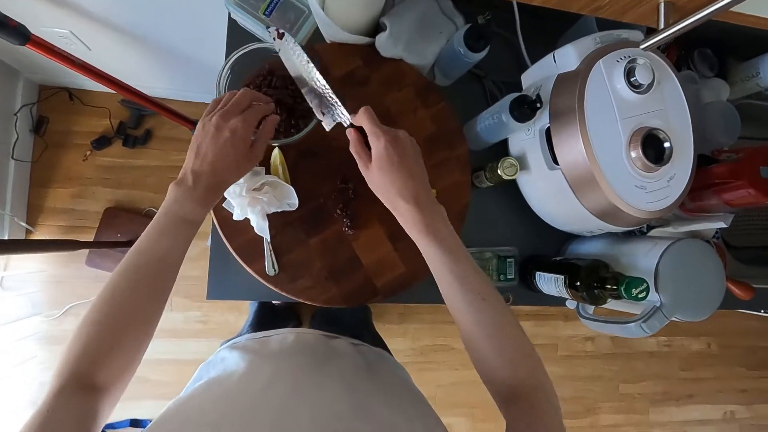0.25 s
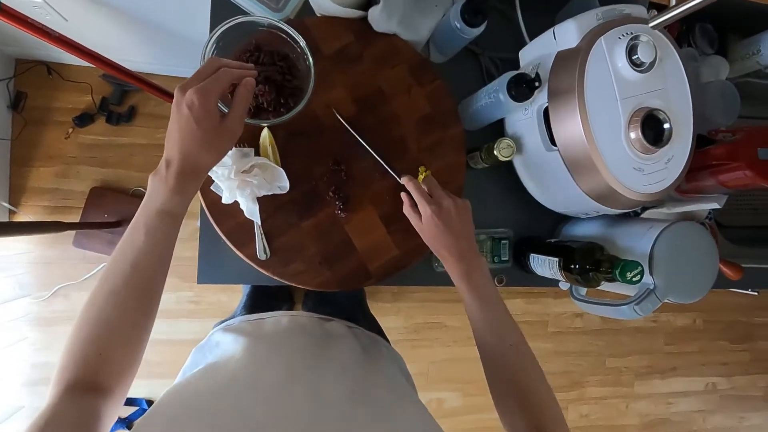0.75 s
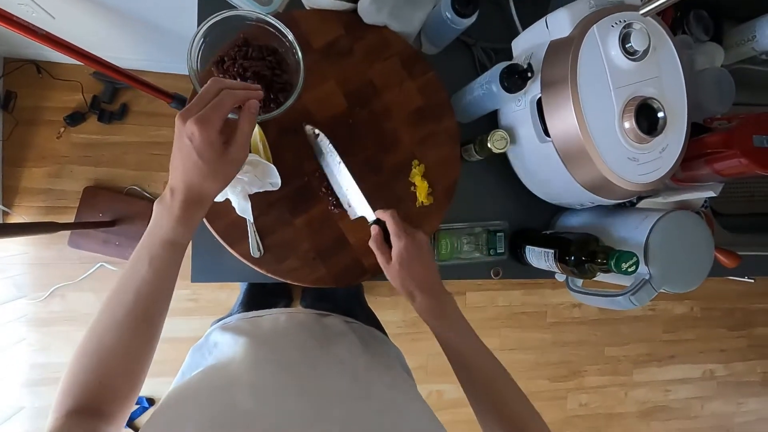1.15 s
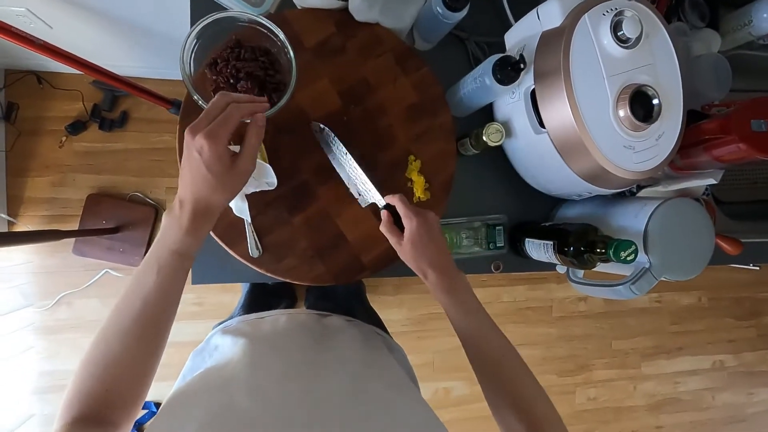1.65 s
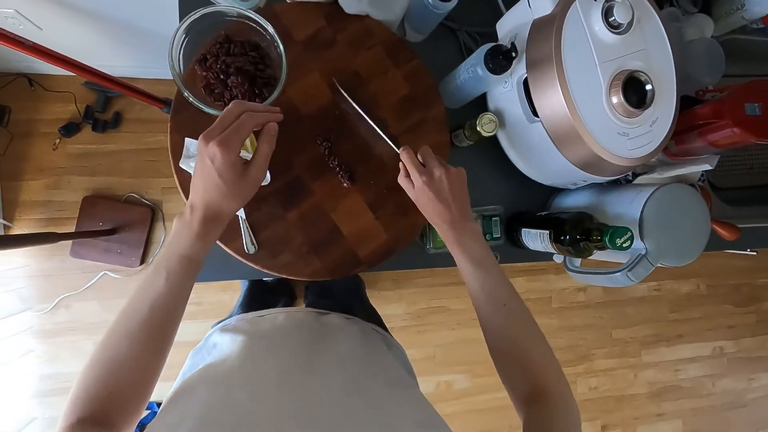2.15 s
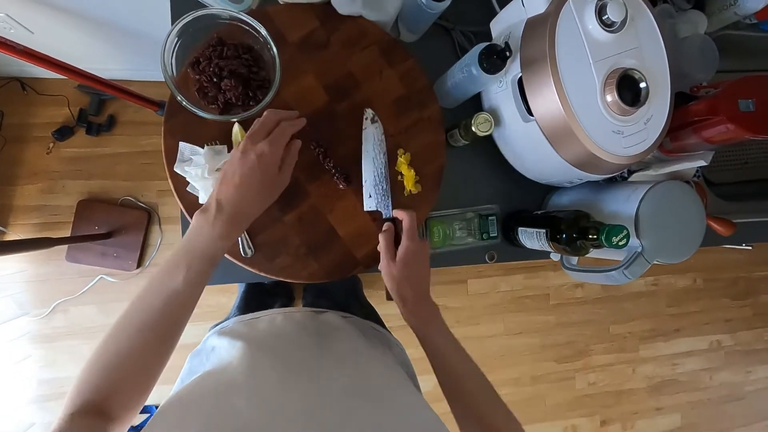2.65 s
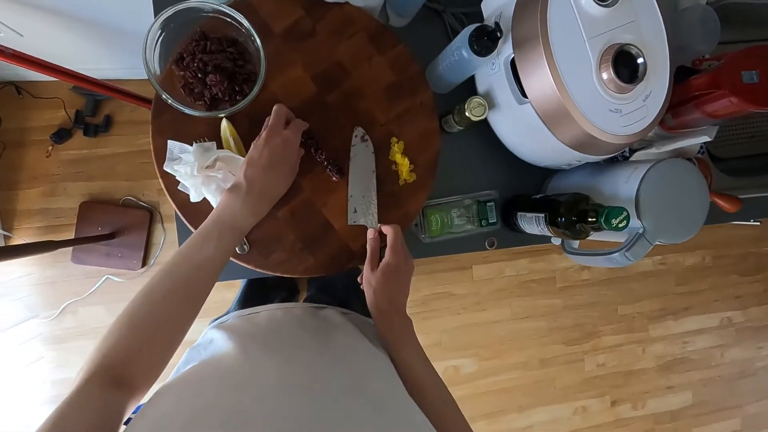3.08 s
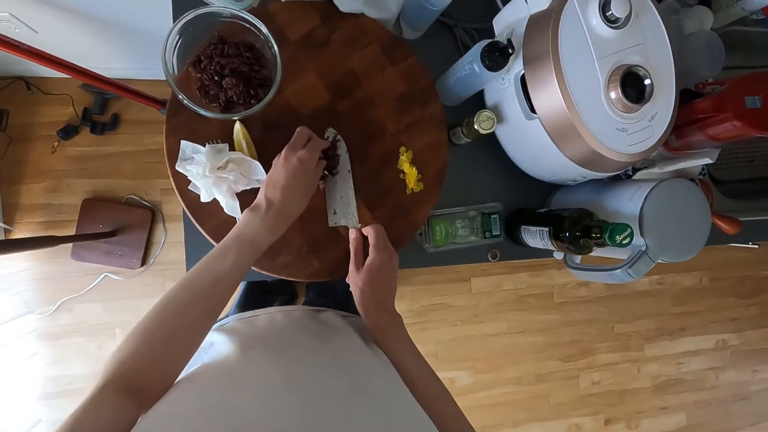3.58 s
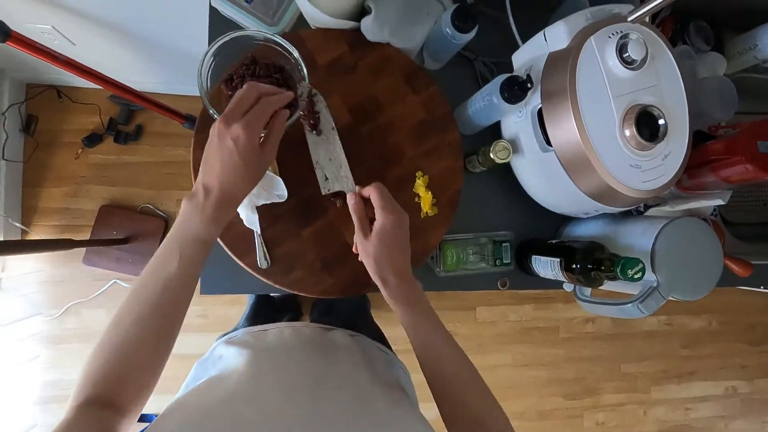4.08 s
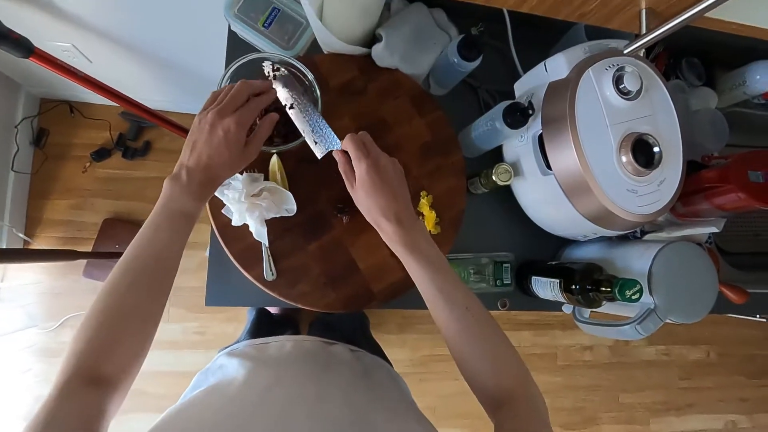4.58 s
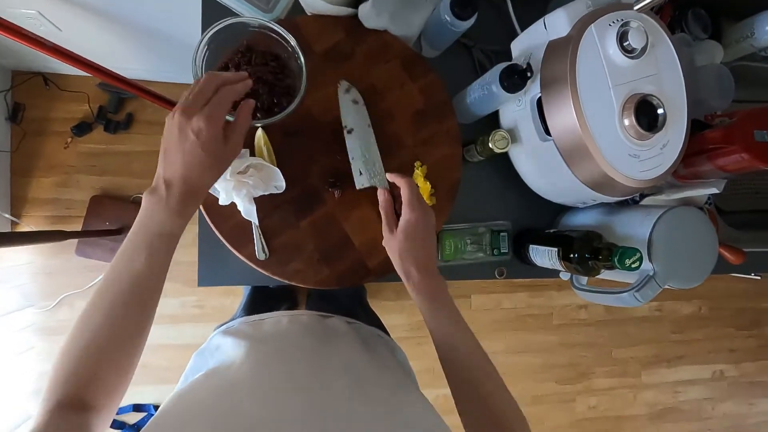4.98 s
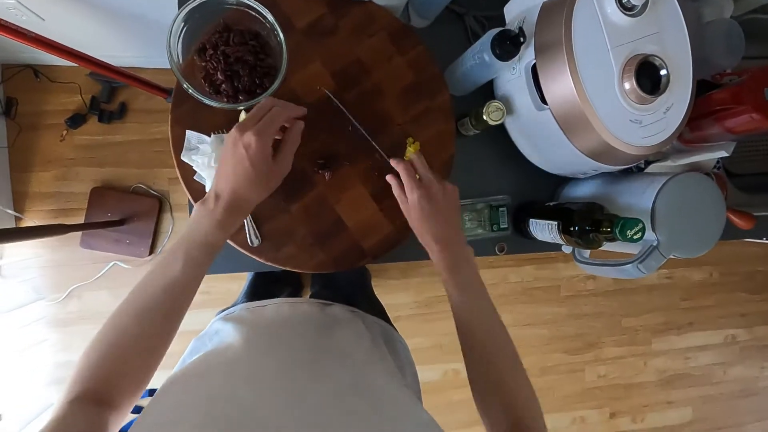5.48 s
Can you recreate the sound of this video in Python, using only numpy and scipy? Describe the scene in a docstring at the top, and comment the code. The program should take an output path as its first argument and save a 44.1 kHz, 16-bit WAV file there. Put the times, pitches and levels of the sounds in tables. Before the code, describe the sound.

In a small home kitchen, a chef's knife knocks on a heavy wooden board, then sweeps across it with bright, ringing steel scrapes. It is laid flat with a clink and slides softly under chopped food, then barely ticks a glass bowl before touching the board again. A low appliance hum wavers underneath, with a very faint bird outside. Close stereo microphones, short room echo.

```python
"""Knife on a chopping board

A chef's knife knocks on an end-grain board (decaying modes and noise bursts) and sweeps chopped food together,
its blade ringing as friction feeds it. It is laid flat to scoop, and ticks over a glass bowl.
An appliance hums (wavering sines) in the small room over filtered noise; a bird chirps very faintly outside
(arched tones). Two close microphones hear it all."""
import sys
import numpy as np
from scipy import signal
from scipy.fft import rfft, irfft, next_fast_len
from scipy.io import wavfile
from scipy.ndimage import uniform_filter1d, map_coordinates

SR = 44100
rng = np.random.default_rng(int(sys.argv[2]) if len(sys.argv) > 2 else 0)


def put_to_file(sound):
    """Save the sound as 16-bit audio at rate SR, in the file named by the first command-line argument."""
    columns = np.atleast_2d(sound).T  # one column per channel
    safe = np.clip(columns, -1, 1)
    whole_steps = np.round(safe * 32767)
    wavfile.write(sys.argv[1], SR, whole_steps.astype(np.int16))


N = 252781
T = np.arange(N) / SR
HIT_T = T[:SR // 2]  # time within one short sound, s

# Blade modes; where the blade touches decides which speak. Each row: frequency in Hz, width in Hz,
# gain in dB as the contact travels outward, then levels in dB sweeping out, sweeping back, sliding flat, tapped.
BLADE_MODES = [(950, 36, -5.5, -10.5, -13, -11, 1), (1239, 19.6, -1, -23, -23, -14, 3),
               (1515, 28, 1, -24, -5.5, -9, 8.5), (1667, 55, -6.5, 0, -8.5, -4, -16),
               (2020, 55, 0, -10, -9.5, -14, -24), (2313, 67, -0.5, -13, -6, 1.5, 8.5),
               (3315, 26, -10.5, -15, -9, -16, -4.5), (3570, 90, 1, -26, -28, -1, 0),
               (4000, 65, -7, -9, -13, -14, -5.5), (4200, 130, -3, -25, -12.5, -21, -16),
               (4400, 130, -3, -26, -12, -19, -18), (4590, 17, 0, -14, -20.5, -5, -9),
               (4825, 45, -7.5, 3.5, -18.5, -1, -7), (5080, 130, -3, -15, -14, -15, -17),
               (5280, 56, 4.5, -18.5, -3.5, -19, -10), (5650, 80, -1, -6, -8, -15, -15),
               (5820, 55, 0, 3, -12, -14, -5), (6190, 65, -0.5, -15, -18, 0.5, -7.5),
               (6750, 50, -4, 0.5, -11.5, -2, -4), (7095, 28, -1.5, 6, 4, -7, -9),
               (7650, 48, -2, 4.5, 4, -3, -13.5), (8160, 70, 3, -2, -2, -16, -15),
               (8790, 130, 0.5, -1, -5.5, -24, -27), (9500, 240, 0.5, -7.5, -11.5, -29, -19),
               (10270, 76, -2.5, -9, -13, -17, -30), (11800, 200, -1, -12, -16, -15, -18)]
# Dense upper modes of the steel. Each row: frequency in Hz, relative level in dB per Hz.
STEEL_SPECTRUM = [(1500, -18), (3000, -5.5), (5000, -12.5), (7000, 0), (8900, -6), (10800, -13),
                  (12300, -13.5), (15500, -28)]
# Rasp of the wood fibres. Each row: frequency in Hz, relative level in dB per Hz.
WOOD_SPECTRUM = [(200, -8.5), (480, -0.5), (640, -5), (900, 6.5), (1400, 1), (2300, -5), (2900, -12.5),
                 (5000, -47)]
# Modes of the board. Each row: frequency in Hz, relative level in dB, 60 dB decay time in seconds.
BOARD_MODES = [(165, -12, .11), (330, -13, .06), (500, -4, .05), (720, -3.5, .035), (830, -6, .03),
               (960, -3, .035), (1130, -14, .03), (1280, -3.5, .03), (1440, -2, .035), (1640, -1, .035),
               (1860, 0, .028), (2050, -4, .022), (2450, -11, .02)]
# Click of the steel contact. Each row: frequency in Hz, relative level in dB per Hz.
CLICK_SPECTRUM = [(800, 13.5), (2400, -7), (3200, 3), (4000, -2.5), (5400, 2.5), (7200, -16), (8500, -12),
                  (9600, -21.5), (12000, -21.5), (15500, -59.5)]
# Thud of the counter under the board. Each row: frequency in Hz, relative level in dB per Hz.
THUD_SPECTRUM = [(40, -9.5), (90, 1.5), (165, 10.5), (260, -8), (420, -7.5), (700, -12.5), (1500, -60)]


def amp(db):
    """Level: decibels become an amplitude factor."""
    return 10 ** (np.asarray(db) / 20)


def unit(x):
    """Normalisation: scale to rms 1."""
    return x / np.sqrt(np.mean(x ** 2) + 1e-20)


def along(points, hz):
    """Logarithmic pitch: interpolate (Hz, value) points on a log frequency axis."""
    f, v = np.transpose(points)
    return np.interp(np.log(hz + 1), np.log(f + 1), v)


def wobble(rate):
    """Slow modulation: a smooth random curve with rate knots a second."""
    knots = rng.standard_normal(int(N * rate / SR) + 4)
    return map_coordinates(knots, [T * rate])


def filtered(x, response):
    """Linear filtering: multiply the spectrum by a response of frequency."""
    n = x.shape[-1]
    m = next_fast_len(n + SR // 4)
    hz = np.fft.rfftfreq(m, 1 / SR)
    return irfft(rfft(x, m) * response(hz), m)[..., :n]


def coloured(x, spectrum):
    """Coloured noise: x shaped by a (Hz, dB) spectrum, at rms 1."""
    return unit(filtered(x, lambda hz: amp(along(spectrum, hz))))


def decay_time(width_hz):
    """Damping: a resonance of this width dies by 60 dB in this many seconds."""
    return np.log(1000) / (np.pi * width_hz)


def burst(x, rise_s=0.00013):
    """Impact: a blow has a finite contact time; its energy is set to that of 10 ms at rms 1."""
    x = x * (1 - np.exp(-(HIT_T / rise_s) ** 2))
    return x / np.sqrt(np.sum(x ** 2) / (SR / 100) + 1e-20)


def ring(modes):
    """Modal decay: one blow on (Hz, dB, t60) modes, each at a slightly random strength and a random phase."""
    total = np.zeros(len(HIT_T))
    for hz, db, t60 in modes:
        decay = amp(db + rng.normal() - 60 * HIT_T / t60)
        total += decay * np.sin(2 * np.pi * (hz * HIT_T + rng.random()))
    return burst(total)


def puff(spectrum, t60):
    """Dense modes: too many to resolve, they sound as a short dying noise."""
    noise = coloured(rng.standard_normal(len(HIT_T)), spectrum)
    return burst(noise * amp(-60 * HIT_T / t60))


def add(track, s, sound):
    """Superposition: mix a sound into the track at s seconds."""
    part = track[round(s * SR):][:len(sound)]
    part += sound[:len(part)]


def chops(settle_s=0.001213, first_touch=0.6, focus_db=22):
    """Impact excitation: the push builds as the edge settles; blade modes that suit the spot ring briefly."""
    # Edge landings. Each row: start in seconds, levels in dB of knock, edge click, low thud and blade ring,
    # pitch in Hz where the ring peaks, tilt of the board modes in dB per octave.
    landings = [(0.7643, -33.5, -45, -40, -54, 5000, -.3), (1.4269, -32, -45.5, -38.5, -54, 6600, 0),
                (2.2144, -34, -50, -43, -56, 6700, .3), (2.7639, -52, -63, -66, -72, 5400, 1)]
    grip_hz = 35  # extra width of the blade's modes while its edge sits in the wood
    out = np.zeros(N)
    push = np.clip(first_touch + HIT_T / (2 * settle_s), 0, 1)
    for s, knock_db, click_db, thud_db, blade_db, peak_hz, tilt_db in landings:
        # blade modes weaken by focus_db per octave away from the peak
        upper = [(hz, -focus_db * abs(np.log2(hz / peak_hz)), decay_time(w + grip_hz))
                 for hz, w, *_ in BLADE_MODES if hz > 3000]
        board = [(hz, db + tilt_db * np.log2(hz / 1000), t60) for hz, db, t60 in BOARD_MODES]
        wood = burst(push * (ring(board) + amp(-1.5) * puff(WOOD_SPECTRUM, t60=0.047)))
        click = amp(click_db) * push * puff(CLICK_SPECTRUM, t60=0.032)
        steel = click + amp(blade_db) * ring(upper)
        thud = amp(thud_db) * puff(THUD_SPECTRUM, t60=0.14)
        add(out, s, amp(knock_db) * wood + steel + thud)
    return out


def sing(hz, width_hz, turns=0):
    """Resonance under friction: noise feeds a mode, its swing steadied; extra turns bend its pitch; rms 1."""
    steadiness, skirt = .42, 7  # exponent of levelling; width of the second resonator over the first
    swing = rng.standard_normal(len(HIT_T))
    for width in (width_hz, skirt * width_hz):
        pole = np.exp((2j * hz - width) * np.pi / SR)
        swing = signal.lfilter([1], [1, -pole], swing)
    size = np.sqrt(abs(uniform_filter1d(abs(swing) ** 2, SR // 200)))
    bent = (swing * np.exp(2j * np.pi * turns)).real
    return unit(bent / (size + 1e-9) ** steadiness)


def friction(rough_db, grain):
    """Stick-slip noise: countless tiny slips of steel over the wood's fibres."""
    n = len(HIT_T)
    slips = rng.standard_normal(n) * np.exp(grain * rng.standard_normal(n))
    return unit(slips * amp(rough_db * wobble(900)[:n]))


def scrapes(pressure_db=.5):
    """Sliding friction: rasp and low modes last as long as the hand presses; the treble swells with speed."""
    # Strokes of the blade over the board, the last a faint scrape on the bowl. Each row: touch in seconds,
    # lift in seconds, fastest moment in seconds, half length of the swing in seconds,
    # travel of the contact (1 outward, -1 inward), ring in dB, hiss in dB, hiss tilt in dB per octave,
    # wood in dB, how the blade is held.
    sweeps = [(0.847, 0.962, 0.922, 0.033, -.3, -66.5, -64, 5, -61.5, "back"),
              (1.476, 1.711, 1.583, 0.042, 1, -39, -45, 4.5, -63, "out"),
              (2.206, 2.499, 2.365, 0.065, -1, -45, -49, 2.5, -58, "back"),
              (3.189, 3.363, 3.256, 0.035, 0, -60, -66.5, -4, -80, "flat"),
              (3.293, 3.624, 3.325, 0.14, 0, -82, -76, -3, -70, "flat"),
              (3.7, 3.9, 3.81, 0.044, 0, -91, -90, 6, -80, "flat"),
              (4.46, 4.6, 4.54, 0.026, 0, -82, -80, 1, -78, "flat")]
    press_s, lift_s = 0.051, 0.017  # the hand leans on the blade and lets go
    # at speed_hz loudness is proportional to speed; higher sounds depend on it more steeply
    speed_hz, speed_law = 6960, 0.89
    steepest_hz = 8500  # above this pitch all of the treble follows the speed alike
    rub_hz = 12  # extra width of the blade's modes while it rubs
    grit_db, grit_per_s = 1.5, 520  # the whole blade sticks and slips
    out = np.zeros(N)
    for touch, lift, fastest, length, travel, ring_db, hiss_db, tilt_db, wood_db, pose in sweeps:
        column = ("out", "back", "flat").index(pose)
        # as the contact travels along the blade, some modes gain and others fade
        place = travel * np.clip((touch + HIT_T - fastest) / (2 * length), -1, 1)
        blade, sizes = np.zeros(len(HIT_T)), []
        for hz, w, lean_db, *levels in BLADE_MODES:
            size = amp(levels[column]) * np.sqrt(w)  # a wider mode takes up more of the noise
            blade += size * amp(lean_db * place) * sing(hz, w + rub_hz)
            sizes.append(size)
        blade /= np.linalg.norm(sizes)
        tilted = [(hz, db + tilt_db * np.log2(hz)) for hz, db in STEEL_SPECTRUM]
        hiss = coloured(friction(rough_db=1, grain=0.45), tilted)
        wood = coloured(friction(rough_db=1.5, grain=0.35), WOOD_SPECTRUM)
        rubbing = amp(ring_db) * blade + amp(hiss_db) * hiss + amp(wood_db) * wood
        hz, t, z = signal.stft(rubbing, SR, nperseg=256)
        height = np.clip(hz, hz[2], steepest_hz)[:, None] / speed_hz
        speed = np.exp(-.5 * ((touch + t - fastest) / length) ** 2)
        pressure = np.clip(np.minimum(t / press_s, (lift - touch - t) / lift_s), 0, 1)
        z = z * pressure * speed ** (height ** speed_law)
        add(out, touch, signal.istft(z, nperseg=256)[1])
    return out * amp(pressure_db * wobble(60) + grit_db * wobble(grit_per_s))


def shifting(x, depth_db, size=(4, 13)):
    """Moving excitation: as the contact slides along the blade, resonances swell and fade each on its own."""
    z = signal.stft(x, nperseg=256)[2]
    field = uniform_filter1d(rng.standard_normal(z.shape), size[0], 0)
    field = unit(uniform_filter1d(field, size[1], 1))
    return signal.istft(z * amp(depth_db * field), nperseg=256)[1][:N]


def squeaks():
    """Self-excitation: where the edge catches, friction feeds one mode, gliding as the contact moves on."""
    # Catches of the edge. Each row: middle in seconds, half length in seconds, pitch in Hz,
    # glide in Hz per second, level in dB.
    catches = [(0.915, 0.014, 2240, -1500, -57.5), (0.919, 0.017, 5500, 6000, -63.5),
               (0.93, 0.01, 6960, 0, -71), (1.529, .016, 7760, -1500, -49), (1.633, 0.0037, 4830, 0, -44),
               (1.634, 0.0056, 5930, 3.5, -46.5), (1.658, .004, 4750, 0, -49.5),
               (1.669, 0.013, 2200, 1, -57), (2.274, 0.017, 7560, 2, -55), (2.316, 0.021, 5420, -3200, -54),
               (2.326, .025, 2265, 3, -52.5), (2.362, 0.0095, 8670, -4000, -50.5),
               (2.398, 0.011, 7130, 3, -38.5), (2.397, 0.011, 7600, -3000, -47),
               (2.431, 0.019, 4350, -5000, -50), (2.447, 0.018, 2250, -1500, -51),
               (2.457, .014, 5830, 1, -51), (2.46, 0.0081, 922, 0, -46.5), (2.489, 0.009, 907, 0, -53)]
    t = HIT_T - HIT_T.mean()
    out = np.zeros(N)
    for s, length, hz, glide, db in catches:
        swell = np.exp(-.5 * (t / length) ** 2)
        voice = sing(hz, .022 * hz, turns=glide * t ** 2 / 2)  # width is a fixed share of the pitch
        add(out, s + t[0], amp(db) * swell * voice)
    return out


def taps(slope_db=34, knock_lag_s=0.002466):
    """Damped free vibration: laid flat, the blade rings, then knocks the board as it lands fully."""
    # Contacts of the flat blade. Each row: start in seconds, levels in dB of ring, click and board knock,
    # lowest and highest pitch in Hz that the contact excites, factor on mode width from the damping hand.
    contacts = [(2.8857, -36.5, -45.5, -40, 1300, 7900, 1.3), (2.9022, -46, -67, -46.5, 1200, 1800, 4),
                (2.938, -52.5, -70, -66, 1450, 4000, 1.2), (5.2865, -47, -60, -46, 2200, 3200, 3.2),
                (5.2922, -51, -61, -55, 1980, 2600, 2.3)]
    out = np.zeros(N)
    for s, ring_db, click_db, knock_db, low_hz, high_hz, damping in contacts:
        modes = []
        for hz, w, *_, tapped_db in BLADE_MODES:
            octaves_outside = abs(np.log2(hz / np.clip(hz, low_hz, high_hz)))
            modes.append((hz, tapped_db - slope_db * octaves_outside, decay_time(w * damping)))
        low_board = ring([mode for mode in BOARD_MODES if mode[0] < 1500])
        rasp = puff(WOOD_SPECTRUM, t60=.035)
        wood = burst(low_board + rasp + amp(-6) * puff(THUD_SPECTRUM, t60=.09))
        click = amp(-0.5) * puff(CLICK_SPECTRUM, t60=0.037)
        hiss = amp(-11) * puff(STEEL_SPECTRUM, t60=0.074)
        add(out, s, amp(ring_db) * ring(modes) + amp(click_db) * (click + hiss))
        add(out, s + knock_lag_s, amp(knock_db) * wood)
    return out


def ticks(focus_db=28):
    """Repeated contact: the blade grazes the bowl in a brief chatter of two touches."""
    # Grazes of the bowl. Each row: start in seconds, level in dB, pitch in Hz where the ring peaks.
    grazes = [(0.245, -66, 6850), (4.552, -66.5, 7700), (4.838, -67.5, 5100)]
    # Modes of the bowl. Each row: frequency in Hz, relative level in dB, 60 dB decay time in seconds.
    bowl_modes = [(4300, -8, .02), (5350, -7, .02), (5950, -2, .025), (6650, -3, .025), (7090, -2, .05),
                  (7700, -3, .05), (8750, -5, .03), (11800, -18, .02)]
    out = np.zeros(N)
    for s, db, peak_hz in grazes:
        modes = [(hz, level - focus_db * abs(np.log2(hz / peak_hz)), t60) for hz, level, t60 in bowl_modes]
        for delay in (0, .005):
            add(out, s + delay, amp(db) * (ring(modes) + puff(CLICK_SPECTRUM, t60=0.066)))
    return out


def bird():
    """Frequency modulation: short, slightly hoarse notes rise and fall in pitch."""
    # Arched notes. Each row: start in seconds, length in seconds, top pitch in Hz before the warble,
    # share by which the ends lie lower, level in dB.
    notes = [(0.529, 0.034, 3750, .08, -74.5), (0.599, 0.02, 4000, .2, -77), (2.796, 0.035, 3630, .2, -76),
             (3.66, 0.037, 3880, .2, -78.5), (4.806, .034, 4400, .27, -66.5),
             (4.851, 0.032, 3680, .16, -68.5)]
    out = np.zeros(N)
    for s, length, top_hz, arch, db in notes:
        u = np.linspace(-1, 1, int(length * SR))
        warble = .006 * wobble(700)[:len(u)]
        hoarseness = .3 * wobble(1800)[:len(u)]
        pitch = top_hz * (1 - arch * u ** 2 + warble)
        tone = np.sin(2 * np.pi * np.cumsum(pitch) / SR)
        add(out, s, amp(db) * np.sqrt(1 - u ** 2) * (1 + hoarseness) * tone)
    return out


def diffuse(pair):
    """Interchannel coherence: two unrelated signals become a sound from all around at two close microphones."""
    # Likeness of the two microphones. Each row: frequency in Hz, left-right correlation.
    likeness = [(60, 0.64), (150, 1), (380, 0.87), (950, 0.6), (2400, 0.25), (6000, 0.78), (8500, 1),
                (12000, 0.5)]

    def mid_side(hz):
        angle = np.arccos(np.clip(along(likeness, hz), 0, 1)) / 2
        return np.array([np.cos(angle), np.sin(angle)])
    mid, side = filtered(pair, mid_side)
    return np.array([mid + side, mid - side])


def appliance():
    """Tonal hum: steady pitches waver in level and phase."""
    # Appliance tones. Each row: frequency in Hz, rms level in dB, unsteadiness in dB.
    tones = [(108, -59, 2.5), (151.5, -56.5, 0), (228, -60, 1.5), (237.1, -71.5, 2), (299.7, -59, 2),
             (329.6, -65, 3.5), (352.9, -62.5, 3), (420.7, -74.5, 3.5)]
    hum = np.zeros(N)
    for hz, db, waver_db in tones:
        phase = 2 * np.pi * hz * T + 0.36 * waver_db * wobble(6)
        hum += amp(db) * unit(amp(waver_db * wobble(7)) * np.sin(phase))
    return hum


def low_background():
    """Modulated noise: rumble and boom wander slowly and now and then swell or dip."""
    # Swells. Each row: middle in seconds, half length in seconds, rise of the rumble in dB, of the boom in dB.
    swells = [(.6, 0.063, 5, 3), (1.447, 0.26, 9.5, -2), (4.3, 0.3, -4, -1.5), (4.885, 0.023, 2, 12.5),
              (5.405, 0.13, -2, 11)]
    # Rumble. Each row: frequency in Hz, relative level in dB per Hz.
    rumble_spectrum = [(14, -47.5), (25, 14.5), (33, 13.5), (43, 24), (65, 22), (85, -6.5), (130, -60)]
    # Boom. Each row: frequency in Hz, relative level in dB per Hz.
    boom_spectrum = [(50, -7), (72, 11.5), (97, 17), (115, 12.5), (132, -30), (200, -70.5)]
    rumble_db, boom_db, drift_db = -54.5, -52.5, 0.5  # resting levels and their slow wander
    for s, length, rumble_rise, boom_rise in swells:
        bump = np.exp(-.5 * ((T - s) / length) ** 2)
        rumble_db = rumble_db + rumble_rise * bump
        boom_db = boom_db + boom_rise * bump
    rumble = coloured(rng.standard_normal(N), rumble_spectrum)
    boom = coloured(rng.standard_normal(N), boom_spectrum)
    return amp(rumble_db + drift_db * wobble(6.4)) * rumble + amp(boom_db + drift_db * wobble(5.7)) * boom


def air_and_fan():
    """Diffuse noise: steady room air and a fan's whirr that grows steadily."""
    # Room air. Each row: frequency in Hz, relative level in dB per Hz.
    air_spectrum = [(76, -41.5), (130, -6.5), (160, -7), (200, -4), (290, -4), (360, -8), (410, -8),
                    (610, -14.5), (1000, -17), (1700, -22), (2600, -36), (4000, -41), (7500, -48),
                    (9500, -63.5), (12000, -60.5), (15500, -77.5)]
    # Fan whirr. Each row: frequency in Hz, relative level in dB per Hz.
    fan_spectrum = [(500, -25), (870, -6.5), (1020, 0.5), (1180, -16.5), (1800, -14.5), (2800, -29),
                    (7500, -49.5), (10000, -58)]
    fan_start_db, fan_rise_db_per_s = -79.5, 4
    air = coloured(diffuse(rng.standard_normal((2, N))), air_spectrum)
    fan = coloured(diffuse(rng.standard_normal((2, N))), fan_spectrum)
    return amp(-55.0) * air + amp(fan_start_db + fan_rise_db_per_s * T) * fan


def room(x, wet_db, wall_s=.022, wall_db=-17):
    """Reverberation: one wall echo, then dense echoes whose every frequency dies at its own speed."""
    # Reverberation. Each row: frequency in Hz, 60 dB decay time in seconds.
    decay_times = [(200, .4), (600, .36), (1500, .37), (4000, .42), (7000, .4), (12000, .3)]
    hz, t, z = signal.stft(rng.standard_normal((2, SR * 3 // 4)), SR, nperseg=256)
    decay = amp(-60 * t / along(decay_times, hz)[:, None])
    tail = diffuse(signal.istft(z * decay, SR, nperseg=256)[1])
    tail = tail * np.clip(T[:tail.shape[1]] / 0.0019, 0, 1)  # the echoes build up within 1.9 ms
    tail = tail / np.linalg.norm(tail[0])
    wall = amp(wall_db) * np.pad(x, (round(wall_s * SR), 0))[:N]
    echoes = signal.fftconvolve(x[None], tail, axes=1)[:, :N]
    return x + wall + amp(wet_db) * echoes


def pan(x, left_db, lead_s):
    """Level and time differences: the left channel is left_db louder and lead_s earlier (negative: later)."""
    side = np.array([[.5], [-.5]])
    return filtered(x, lambda hz: amp(side * left_db) * np.exp(2j * np.pi * hz * side * lead_s))


def scene():
    """Superposition: knife work close below the microphones, in the humming kitchen."""
    knocks = pan(room(chops(), wet_db=-5.5), left_db=1.0, lead_s=-0.000022)
    touches = room(taps(), wet_db=-5.5) + room(ticks(), wet_db=-9.5)
    rings = pan(touches, left_db=2.5, lead_s=-0.0000086)
    rubbing = shifting(scrapes(), depth_db=1.3) + squeaks()
    strokes = pan(room(rubbing, wet_db=-7.0), left_db=2.0, lead_s=-0.0000054)
    background = appliance() + low_background() + air_and_fan()
    outside = room(bird(), wet_db=-7)
    surroundings = pan(background + outside, left_db=0.78, lead_s=-.000007)
    return knocks + rings + strokes + surroundings


def record(dry):
    """Band limiting: nothing at or above 15.5 kHz is kept."""
    return filtered(dry, lambda hz: hz < 15500)


dry = scene()
out = record(dry)
put_to_file(out)
```